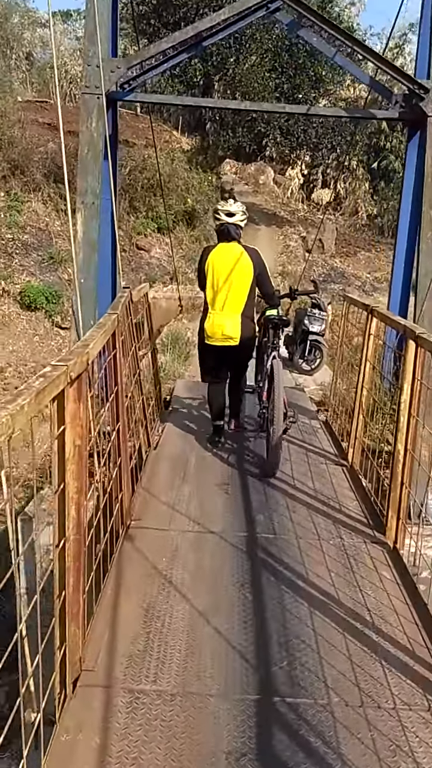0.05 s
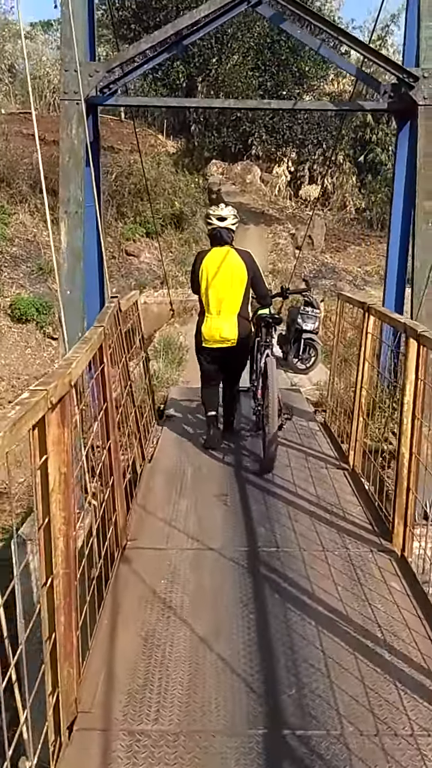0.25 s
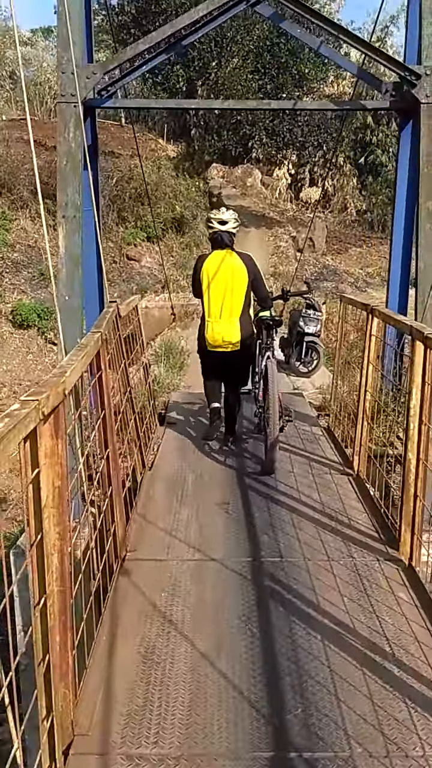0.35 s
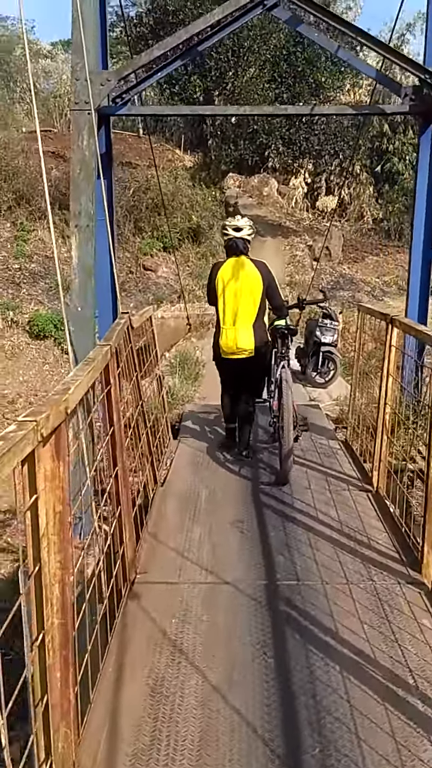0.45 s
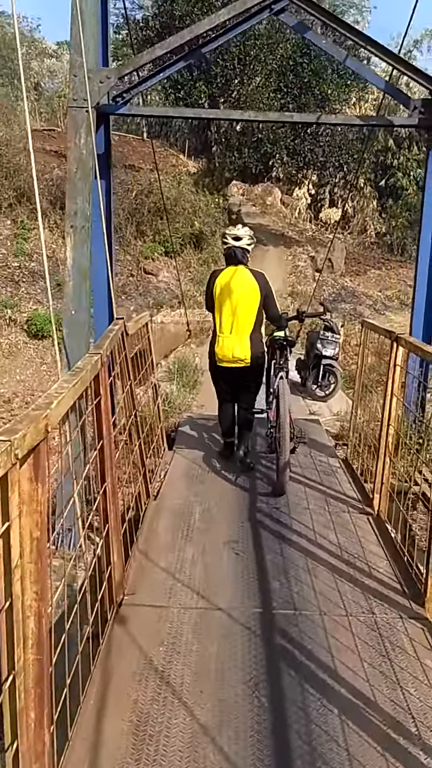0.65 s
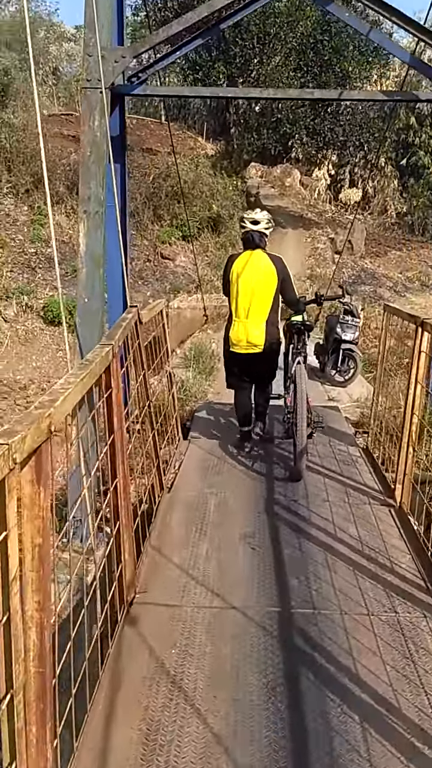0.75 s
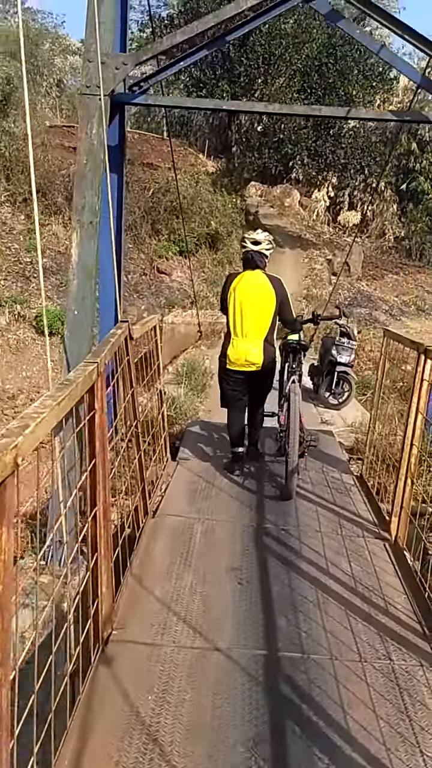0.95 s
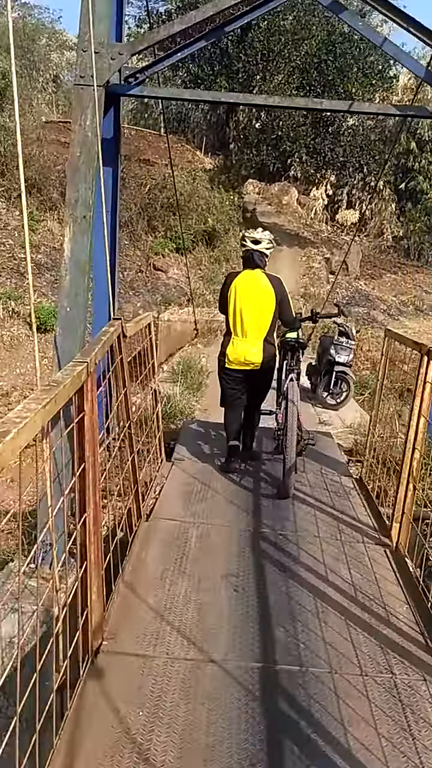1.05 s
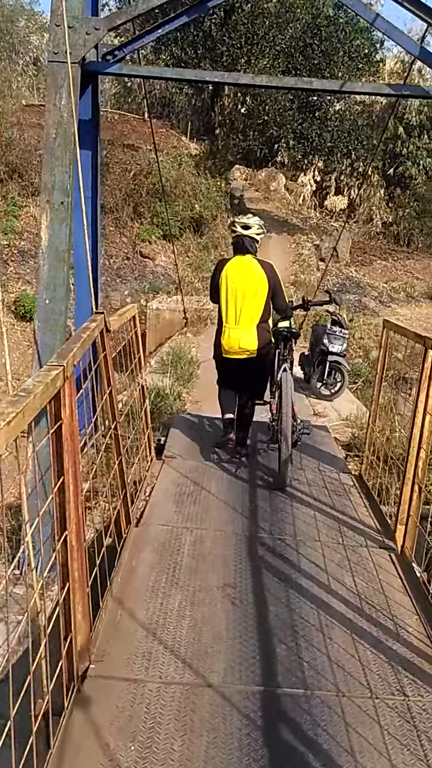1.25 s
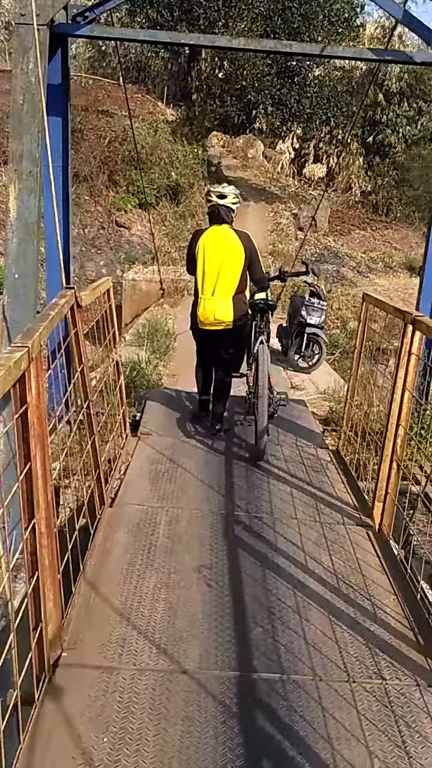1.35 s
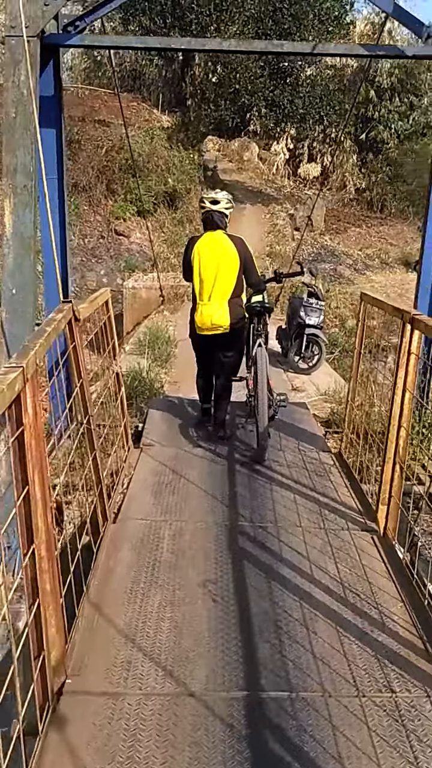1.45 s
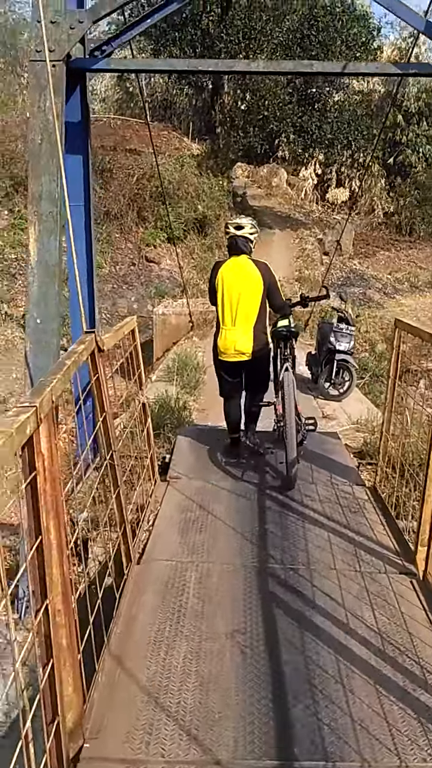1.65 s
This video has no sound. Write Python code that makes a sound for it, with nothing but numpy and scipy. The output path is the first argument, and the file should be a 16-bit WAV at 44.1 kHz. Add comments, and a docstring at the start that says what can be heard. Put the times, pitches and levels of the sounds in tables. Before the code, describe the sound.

A loose metal plate clanks on a steel footbridge amid wind rumble and low thumps.

```python
"""A faint outdoor hush and a small bird's whistle come first, then a gust rumbles on the left side of
the microphone. A bicycle is wheeled over the steel deck of a small suspension bridge: metal parts
click, and low thumps come from footsteps and puffs of wind. One loose plate strikes its frame, then
comes down again with a rattling clank and a squeak. Birds call in between, and a faint hollow
ringing swells briefly."""
import sys
import numpy as np
from scipy import signal
from scipy.fft import rfft, irfft
from scipy.io import wavfile
from scipy.ndimage import uniform_filter1d

SR = 44100
rng = np.random.default_rng(int(sys.argv[2]) if len(sys.argv) > 2 else 0)


def master_out(mix):
    """Clip the mix to full scale and print it as 16-bit PCM to the path in sys.argv[1]."""
    frames = np.transpose(np.atleast_2d(mix))
    ceiling = np.clip(frames, -1, 1)
    pcm = np.round(ceiling * 32767).astype(np.int16)
    wavfile.write(sys.argv[1], SR, pcm)


N = 74970
T = np.arange(N) / SR
PLATE_PAN_DB = 10   # the plate and its squeaks are on the left


def from_db(db):
    return 10 ** (np.asarray(db) / 20)


def rms_one(x):
    return x / np.sqrt(np.mean(x ** 2) + 1e-20)


def in_time(rows):
    return np.interp(T, *np.transpose(rows))


def at_hz(points, hz):
    known_hz, values = np.transpose(points)
    return np.interp(np.log(hz), np.log(known_hz), values)


def pan(db):
    """Left and right gains, with the left louder by db."""
    gains = from_db([[db / 2], [-db / 2]])
    return gains / gains.mean()


def dying(t60):
    """A fade that drops 60 dB in t60 seconds, the fade time."""
    return from_db(-60 * T / t60)


def convolve(x, response):
    return signal.fftconvolve(np.atleast_2d(x), np.atleast_2d(response), axes=1)[:, :N]


def drift(rate):
    """A smooth random wobble of about size one; a higher rate is quicker."""
    r = np.exp(-80 * np.pi * rate / SR)
    slow = signal.lfilter([1], [1, -2 * r, r * r], rng.standard_normal(N // 40 + 2002))[2000:]
    return np.interp(np.arange(N) / 40, np.arange(len(slow)), rms_one(slow))


def coloured(spectrum):
    """Two unrelated noises with the given balance of low and high."""
    hz = np.maximum(np.arange(N // 2 + 1) * SR / N, 1)
    white = rfft(rng.standard_normal((2, N)))
    return rms_one(irfft(white * from_db(at_hz(spectrum, hz)), N))


def impulses(rows, scatter_db=0):
    """One sharp tap for each (time [s], level [dB])."""
    s, db = np.transpose(rows)
    sizes = from_db(db + scatter_db * rng.standard_normal(len(s)))
    return np.bincount((s * SR).astype(int), sizes, N)[:N]


def ring(x, hz, t60):
    """Each tap in x starts a fading tone."""
    r, w = from_db(-60 / (t60 * SR)), 2 * np.pi * hz / SR
    return signal.lfilter([0, np.sin(w)], [1, -2 * r * np.cos(w), r * r], x + 1e-18)


def struck_tones(blows, tones, scatter_db):
    """Each blow rings all the tones, in a slightly different mix."""
    return sum((-1) ** k * from_db(db) * ring(impulses(blows, scatter_db), hz, t60)
               for k, (hz, db, t60) in enumerate(tones))


def dense_ringing(hits, spectrum, fade):
    """Countless overlapping tones blur into noise that fades after each hit."""
    energy = uniform_filter1d(convolve(hits ** 2, fade ** 2), SR // 400)
    return coloured(spectrum) * np.sqrt(np.abs(energy))


def echo(x, t60):
    """A wash of reflections, different on each side, as strong as the sound itself."""
    response = rng.standard_normal((2, N)) * dying(t60)
    return convolve(x, rms_one(response) / np.sqrt(N))


def glides(rows, waver):
    """One swelling, sliding tone for each row, with a wavering pitch."""
    out = 0
    for s, length, start_hz, end_hz, db in rows:
        along = np.clip((T - s) / length, 0, 1)
        hz = start_hz + (end_hz - start_hz) * along + waver
        out = out + from_db(db) * np.sin(np.pi * along) ** 2 * np.sin(2 * np.pi * np.cumsum(hz) / SR)
    return out


def hush():
    """The outdoor background: soft noise that wavers gently in each band of pitch."""
    # colour of the hush (frequency [Hz], relative level [dB])
    spectrum = [(30, 16), (70, -5), (160, 5), (330, -2.5), (600, 1.5), (900, -2.5), (1300, -9.5),
                (2000, -11), (3500, -18.5), (5500, -21), (7000, -31), (8000, -38), (10000, -49.5)]
    # its loudness (time [s], level [dB])
    loudness = [(0, -49), (.5, -47.5), (1.1, -49.5), (1.45, -49), (1.7, -52.5)]
    # how alike left and right are (frequency [Hz], likeness [0 to 1])
    likeness = [(60, .3), (250, 0.93), (600, 0.82), (1500, 0.78), (4000, 0.13), (9000, 0.17)]
    edges_hz = np.geomspace(30, 11000, 18)
    noises = [coloured(spectrum), coloured(spectrum)]
    out = 0
    for k, (low, high) in enumerate(zip(edges_hz, edges_hz[1:])):
        band = signal.butter(2, [low, high], "band", fs=SR, output="sos")
        mid, side = signal.sosfilt(band, noises[k % 2])
        alike = at_hz(likeness, np.sqrt(low * high))
        stereo = np.sqrt(1 + alike) * mid + np.sqrt(1 - alike) * side * [[1], [-1]]
        out = out + from_db(2.5 * drift(12.1)) * stereo
    return rms_one(out) * from_db(in_time(loudness)) * pan(10.5)


def birds():
    """One far bird repeats a falling whistle, a nearer one chirps higher; the hillside echoes both."""
    # whistles (time [s], start pitch [Hz], level [dB])
    whistle_calls = [(0.076, 3140, -55.5), (0.326, 3190, -56.5), (0.574, 3246, -53.5), (0.828, 3180, -52.5),
                     (1.085, 3150, -55)]
    # chirps (time [s], length [s], start pitch [Hz], end pitch [Hz], level [dB])
    chirp_calls = [(.433, .03, 4380, 4200, -46.5), (.791, 0.071, 4344, 4304, -37.5)]
    whistle_s, fall_hz, waver_hz, jitter_hz = 0.09, 404, 31.4, 55
    falls = [(s, whistle_s, hz, hz - fall_hz, db) for s, hz, db in whistle_calls]
    waver = waver_hz * drift(110)
    roughness = from_db(2 * drift(200))
    whistles = roughness * glides(falls, waver)
    chirps = roughness * glides(chirp_calls, waver + jitter_hz * drift(470))
    far = whistles + from_db(-6.5) * chirps   # the nearer bird has less echo
    reflections = from_db(-1) * echo(far, t60=0.31)
    hillside = from_db(-15.5) * echo(far, t60=0.95)
    return (whistles + chirps + reflections + hillside) * pan(12)


def hollow_swells():
    """A faint hollow ringing swells up for a moment, now and then."""
    # swells (time of the peak [s], pitch [Hz], level [dB])
    swells = [(0.838, 550.3, -41), (0.974, 513, -44), (1.089, 494, -45.5), (1.132, 715, -48.5),
              (1.144, 566, -45)]
    width_s, waver_hz = 0.0092, 25.9
    out = 0
    for s, hz, db in swells:
        tone = np.sin(2 * np.pi * np.cumsum(hz + waver_hz * drift(120)) / SR)
        out = out + from_db(db) * tone * np.exp(-((T - s) / width_s) ** 2)
    return out * pan(15)


def wind():
    """Swirls of air buffet the left side of the microphone and barely reach the right."""
    # colour of the rumble (frequency [Hz], relative level [dB])
    spectrum = [(25, -39), (40, -20.5), (60, 2), (100, 2), (160, 0.5), (240, -6.5), (320, -14), (420, -26),
                (700, -44.5), (1500, -93.5)]
    # strength of the gust (time [s], relative level [dB])
    gust = [(0.0, -69), (0.202, -53), (0.26, -30), (0.312, -26), (0.364, -30.5), (0.396, -22), (0.434, -32),
            (0.468, -25), (0.554, -32), (0.568, -25.5), (0.592, -22), (0.606, -30.5), (0.638, -34.5),
            (0.71, -28.5), (0.762, -28), (0.786, -36), (0.818, -30), (0.842, -36.5), (0.89, -28.5),
            (0.912, -31.5), (0.956, -31), (0.988, -39), (1.06, -35.5), (1.08, -32.5), (1.11, -27),
            (1.13, -53), (1.16, -32), (1.188, -29.5), (1.215, -47.5), (1.272, -52), (1.392, -49),
            (1.414, -51), (1.438, -53), (1.59, -68), (1.7, -59)]
    # boost or cut of the rumble's upper part (time [s], gain [dB])
    brightness = [(0, 3), (.3, 1), (.6, 3), (.77, 3), (.9, -30), (1.2, -8.5), (1.7, 5)]
    swirls = coloured(spectrum) * from_db(drift(39))
    upper = signal.sosfiltfilt(signal.butter(3, 220, "high", fs=SR, output="sos"), swirls)
    swirls = swirls + upper * (from_db(in_time(brightness)) - 1)
    # even out the noise so that the gust sets its loudness
    power = uniform_filter1d(swirls ** 2, int(0.024 * SR) + 1)
    swirls = swirls / np.sqrt(power + 1e-9)
    return swirls * from_db(in_time(gust) + 5.5) * from_db([[0], [-27]])


def low_thumps():
    """Low thumps from footsteps and puffs of wind: each is a soft push that sets deep tones booming."""
    # thumps (time [s], level [dB])
    thumps = [(.14, -54.5), (.378, -31.5), (.49, -33.5), (.575, -39), (.9, -45), (1.158, -43), (1.275, -45),
              (1.32, -46), (1.357, -40), (1.402, -41.5), (1.63, -54)]
    # deep tones of the boom (pitch [Hz], relative level [dB], fade time [s])
    tones = [(66, -23.5, 0.091), (84, 2.5, 0.069), (127.9, 2.5, 0.19), (154.3, -7, 0.6), (179, -3, 0.51),
             (220, -8.5, 0.31), (276.5, -6.5, 0.39), (324.2, -7.5, 0.98), (505, -28, .3)]
    push_s = 0.0032
    push = np.hanning(int(push_s * SR) + 3)
    boom = struck_tones(thumps, tones, scatter_db=1.5)
    return convolve(boom, push / push.sum()) * pan(4)


def clicks():
    """Small metal parts touch: each pings, scrapes briefly and leaves a shimmer in the steelwork."""
    # touches (time [s], level [dB], pitch of the part [Hz])
    touches = [(0.401, -32.5, 7400), (0.403, -36, 4720), (0.412, -36, 4550), (0.4653, -33.5, 7350),
               (0.4753, -29, 6520), (.483, -41.5, 4310), (.5268, -21.5, 6550), (.533, -35, 6120),
               (0.548, -35.5, 5650), (0.5622, -30, 6600), (0.6026, -30, 6520), (.695, -47.5, 4300),
               (1.337, -43.5, 8500)]
    # tones that all the parts share (pitch [Hz], relative level [dB], fade time [s])
    tones = [(3160, -9, 0.034), (4160, -20, 0.014), (4400, -16.5, 0.018), (6420, -4.5, .025),
             (6900, -7.5, .022), (7436, 1.5, 0.031), (8626, -8, 0.041)]
    # colour of the shimmer (frequency [Hz], relative level [dB])
    spectrum = [(1500, -5.5), (2800, -15.5), (3600, -14.5), (4500, -1.5), (5600, -6), (6600, 0), (7400, -2),
                (8000, -14), (8700, -9.5), (9600, -32)]
    grains_per_s = 1100
    blows = [(s, db) for s, db, hz in touches]
    hits = impulses(blows)
    pings = sum(ring(impulses([(s, db)]), hz, t60=0.029) for s, db, hz in touches)
    grains = rng.standard_normal(N) * (rng.random(N) < grains_per_s / SR)
    scrape = from_db(-7) * grains * dying(0.11)
    scrape[0] = 1   # the first clean touch
    rings = struck_tones(blows, tones, scatter_db=0.5)
    snap = signal.sosfilt(signal.butter(2, [3500, 8000], "band", fs=SR, output="sos"), hits)
    scraped = convolve(from_db(-15.5) * rings + from_db(1) * snap, scrape)
    shimmer = dense_ringing(hits, spectrum, fade=dying(0.11) + from_db(-22) * dying(0.99))
    return (from_db(-7) * pings + scraped + from_db(-13) * shimmer) * pan(11)


def squeaks():
    """Steel rubs on steel as the plate goes down and as it settles."""
    # rubs (time [s], length [s], start pitch [Hz], end pitch [Hz], level [dB])
    rubs = [(1.24, 0.017, 2764, 2710, -37), (1.359, 0.015, 3230, 3120, -41)]
    tone = glides(rubs, waver=60 * drift(520))
    return (tone + from_db(-2) * echo(tone, t60=0.21)) * pan(PLATE_PAN_DB)


def loose_plate():
    """A loose plate chatters against its frame and rings; the frame carries a long faint tail."""
    # strikes (time [s], level [dB], length of the chatter [s])
    clanks = [(.529, -38.5, .025), (.565, -42, .04), (1.246, -39.5, .006), (1.2507, -33, .005),
              (1.257, -32.5, .005), (1.2627, -29.5, .009), (1.277, -33.5, .008), (1.291, -40, .055)]
    # the plate's strong tones (pitch [Hz], relative level [dB], fade time [s])
    tones = [(660, -4.5, 0.44), (1016, -2, 0.4), (1440, 5, 0.15), (1524, -11.5, 0.35), (1690, 1.5, 0.11),
             (1735, -0.5, 0.23), (1769, 4, .24), (1893, 1.5, 0.22), (2003, -4, .24), (2112, -1, 0.39),
             (2240, 5.5, 0.17), (2338, -1, 0.31), (2660, -5.5, .18), (3025, -2, .18), (3752, -3, 0.3),
             (3773, -0.5, 0.2)]
    # the crowd of its weaker tones (frequency [Hz], relative level [dB])
    spectrum = [(200, 8.5), (500, -8.5), (950, -4.5), (1200, -12.5), (1750, 3.5), (2400, -4.5),
                (2950, -10.5), (3900, -8), (4600, -10), (5600, -9), (7000, -13.5), (8000, -26),
                (9200, -29.5)]
    contacts_per_s = 860
    contacts = np.zeros(N)
    for s, db, length in clanks:
        touching = rng.random(N) < contacts_per_s / SR
        burst = rng.standard_normal(N) * touching * (T > s) * (T < s + length)
        burst[int(s * SR)] = 2   # a firm first contact
        contacts += from_db(db) * burst / np.sqrt(np.sum(burst ** 2))
    ringing = 0
    for hz, db, t60 in tones:
        tone = ring(contacts * rng.choice([-1, 1], (2, N)), hz, t60)
        # keep the tone's energy the same however the contacts add up or cancel
        energy = np.sum(contacts ** 2) * np.sum(dying(t60) ** 2) / 2
        ringing += from_db(db) * tone * np.sqrt(energy / np.sum(tone ** 2, axis=1, keepdims=True))
    grit = from_db(1) * dying(0.0038)
    crash = from_db(-1) * dying(0.15)
    frame_tail = from_db(-15) * dying(0.78)
    clatter = dense_ringing(contacts, spectrum, fade=grit + crash + frame_tail)
    return (from_db(-9.5) * ringing / 2 + clatter) * pan(PLATE_PAN_DB)


def scene():
    """All the sounds together at the microphone."""
    return wind() + low_thumps() + clicks() + loose_plate() + squeaks() + hollow_swells() + birds() + hush()


def record(dry):
    """The microphone loses the deepest rumble, has a dip in the treble and cuts the top steeply."""
    low_cut_hz, dip_hz, top_hz = 52.3, 8020, 10050
    dry = signal.sosfilt(signal.butter(4, low_cut_hz, "high", fs=SR, output="sos"), dry)
    dry = signal.lfilter(*signal.iirnotch(dip_hz, Q=8, fs=SR), dry)
    return signal.sosfilt(signal.cheby2(18, 60, top_hz, fs=SR, output="sos"), dry)


dry = scene()
out = record(dry)
master_out(out)
```